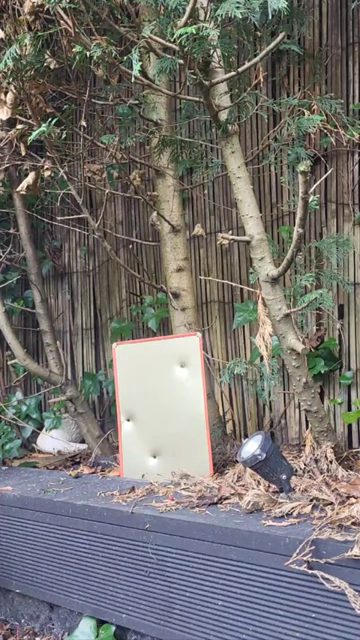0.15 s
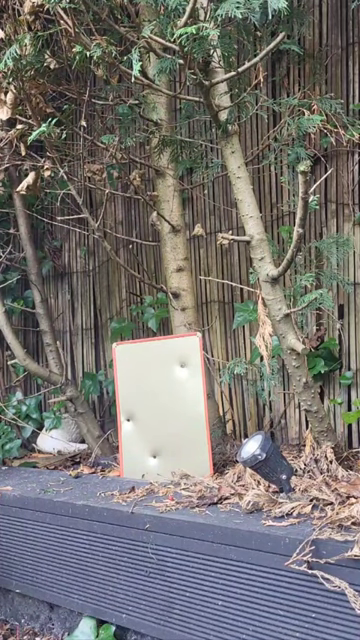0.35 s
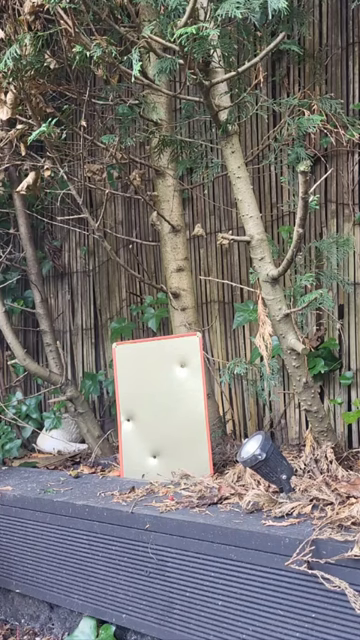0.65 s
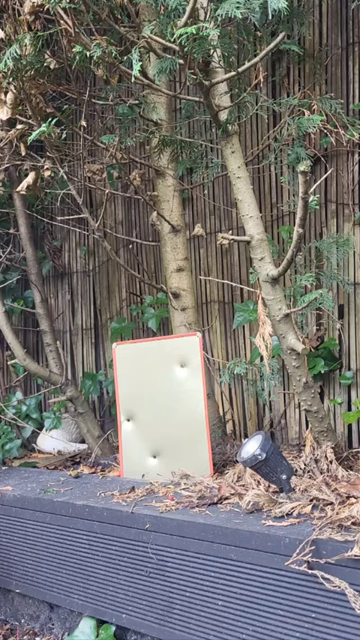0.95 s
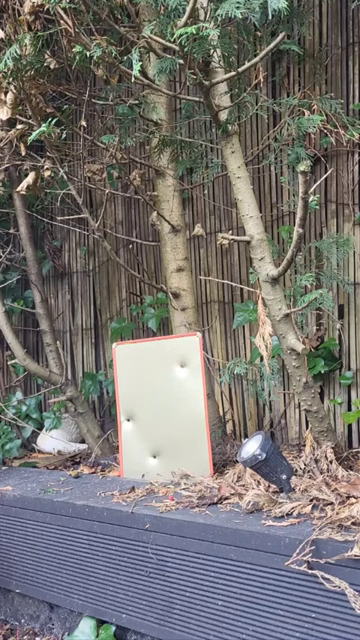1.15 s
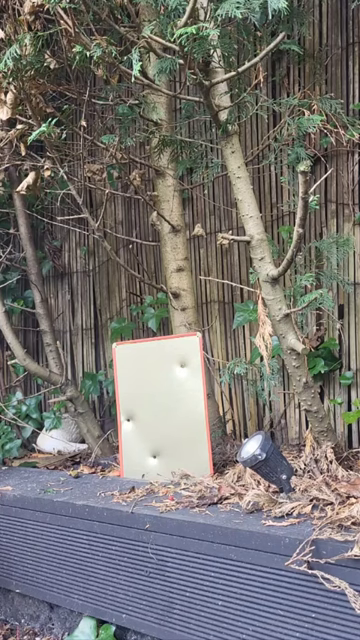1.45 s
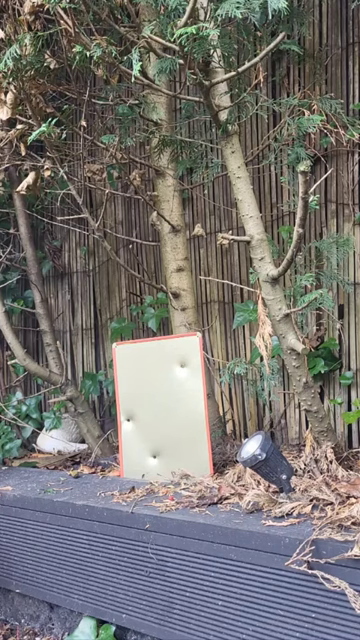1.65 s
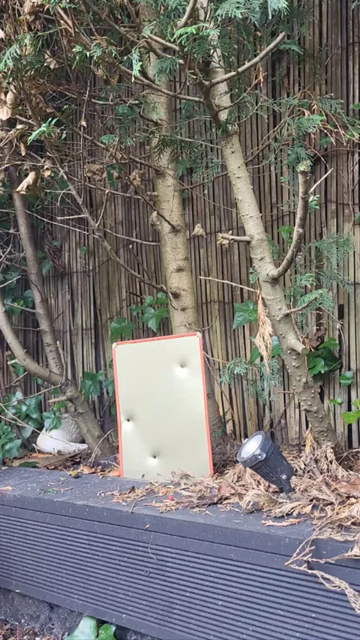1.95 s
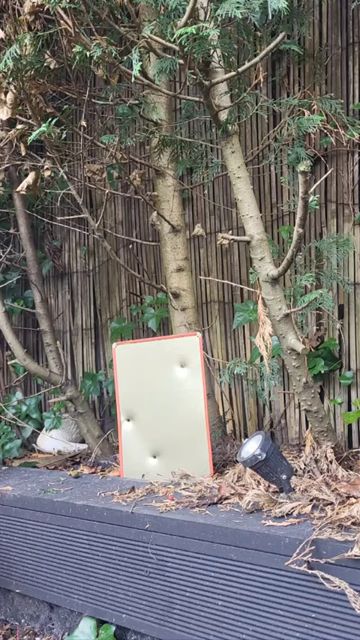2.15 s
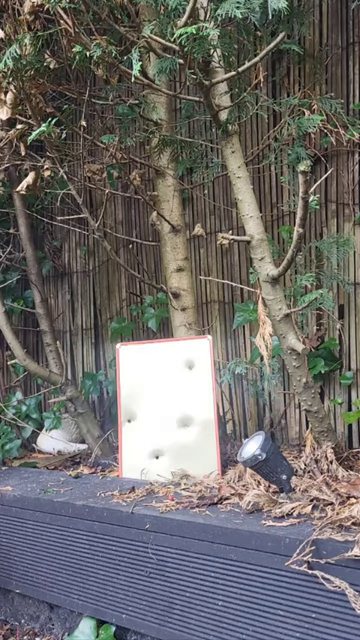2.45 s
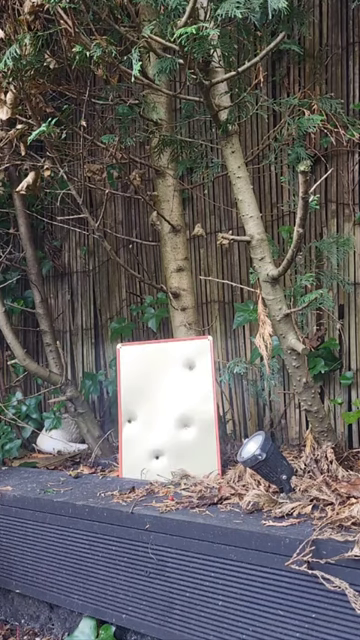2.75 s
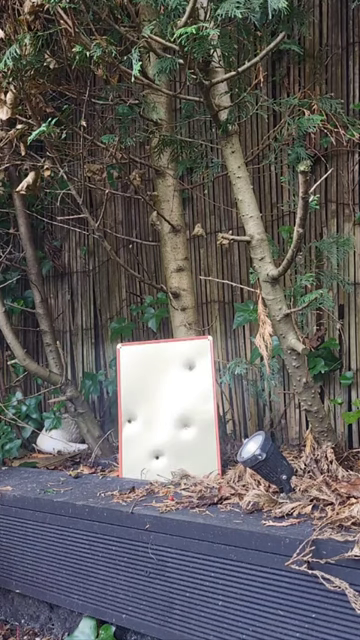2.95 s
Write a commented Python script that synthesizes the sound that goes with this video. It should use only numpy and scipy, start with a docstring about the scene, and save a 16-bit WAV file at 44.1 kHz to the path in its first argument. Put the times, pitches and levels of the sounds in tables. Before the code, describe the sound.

An air rifle fires once after two quiet seconds; almost at once the pellet dents a thin metal plate with a bright crash and brief rattle. Garden echo fades over low rumble, recorded in stereo near the shot.

```python
"""A spring air rifle fires once in a garden: its knocks are clicks and rattles of dense metal modes.
A moment later the pellet dents a thin plate: a damped pulse, a noisy crash, ringing modes and knocks.
The fence and trees scatter the sound back, made by sparse random echoes. Behind lie filtered noises:
low rumble, distant traffic, a leafy hiss with ticks and a very faint early bird.
The shot pushes the recorder's gain down, and the background with it."""
import sys
import numpy as np
from scipy import signal
from scipy.fft import rfft, irfft
from scipy.io import wavfile
from scipy.ndimage import uniform_filter1d

SR = 44100
rng = np.random.default_rng(int(sys.argv[2]) if len(sys.argv) > 2 else 0)


def wrap_up_sound(samples):
    """Save the sound to the file named by the first command line argument, as 16-bit audio."""
    columns = np.atleast_2d(samples).T
    # keep every value between -1 and 1, then stretch to whole-number steps
    tamed = np.clip(columns, -1, 1)
    steps = np.round(tamed * 32767).astype(np.int16)
    wavfile.write(sys.argv[1], SR, steps)


N = 136710

# colour of the plate's dense modes: (frequency [Hz], density level [dB per Hz])
PLATE_COLOUR = [(60, -12), (250, -11), (400, -15.5), (550, -13), (760, -2), (1150, -7), (1550, -1.5),
                (1900, -5.5), (2500, -5), (3100, 0.5), (4400, 1), (6200, 0), (8000, 3.5), (10700, -6),
                (12000, -4), (15500, -7)]
PLATE_START_S = 2.2288


def amp(db):
    """Decibels to gain."""
    return 10 ** (np.asarray(db) / 20)


def unit(x):
    """Scales to rms 1."""
    return x / np.sqrt(np.mean(x ** 2) + 1e-20)


def read(points, hz):
    """Reads a table on a log-frequency axis."""
    f, value = np.transpose(points)
    return np.interp(np.log(hz + 1), np.log(f + 1), value)


def level(points):
    """Gain along a curve of (time [s], level [dB]) points."""
    return amp(np.interp(np.arange(N) / SR, *np.transpose(points)))


def add(mix, s, sound):
    """Mixes a sound in at time s, cut at the end of the mix."""
    part = mix[:, round(s * SR):][:, :sound.shape[-1]]
    part += sound[..., :part.shape[-1]]


def colour(x, points, share=1):
    """Minimum-phase filter with a share of the given dB curve."""
    size = 8192
    hz = abs(np.fft.fftfreq(size, 1 / SR))
    log_gain = np.log(amp(share * read(points, hz)))
    response = np.exp(np.conj(signal.hilbert(log_gain)))
    taps = np.fft.ifft(response).real[:size // 2]
    return signal.fftconvolve(x, taps[None], axes=1)[:, :x.shape[1]]


def noise(spectrum, likeness, size):
    """Stereo noise of rms 1 with a given colour and left-right likeness."""
    hz = np.fft.rfftfreq(size, 1 / SR)
    mid, side = rfft(rng.standard_normal((2, size)))
    same = np.clip(read(likeness, hz), -1, 1)
    mid = mid * np.sqrt(1 + same)
    side = side * np.sqrt(1 - same)
    left_right = np.array([mid + side, mid - side])
    return unit(irfft(left_right * amp(read(spectrum, hz)), size))


def fall(t, t60):
    """Exponential decay by 60 dB in t60 seconds."""
    return np.exp(-np.log(1000) * np.maximum(t, 0) / t60)


def swell(t, rise, t60):
    """Linear rise, then exponential decay."""
    return np.minimum(t / rise, 1) * fall(t - rise, t60)


def die_away(x, t60s, hold=0):
    """Lets each band decay at its own speed after a hold."""
    hz, t, z = signal.stft(x, SR, nperseg=256)
    z = z * fall(t - hold, read(t60s, hz)[:, None])
    return signal.istft(z, SR, nperseg=256)[1][:, :x.shape[1]]


def drift(slow_hz, fast_hz):
    """Random wander of rms 1: twenty sines with random phases."""
    t = np.arange(N) / SR
    rates = np.geomspace(slow_hz, fast_hz, num=20)
    return unit(sum(np.sin(2 * np.pi * (f * t + rng.random())) for f in rates))


def metal(spectrum, size):
    """The dense modes of a metal part: noise of rms 1 gathered into uneven random peaks."""
    # left-right likeness of the dense modes: (frequency [Hz], likeness [0-1])
    shot_likeness = [(100, 0.3), (500, 0.8), (1200, 0.34), (3000, 0.03), (8000, 0)]
    bunch_db, bunch_spacing_hz = 2.3, 70
    hz = np.fft.rfftfreq(size, 1 / SR)
    rows = rng.standard_normal((3, 1024))
    bunches = [np.interp(hz / bunch_spacing_hz, np.arange(len(row)), row) for row in rows]
    # one bunching is common to both ears, one belongs to each ear
    peaks_db = bunch_db * (np.array(bunches[1:]) + bunches[0]) / np.sqrt(2)
    return unit(irfft(rfft(noise(spectrum, shot_likeness, size)) * amp(peaks_db), size))


def rifle():
    """Each knock is a click and a short steel rattle; the stock thuds with the recoil."""
    # release, piston, air blast, spring:
    # (time [s], click peak [dB], rattle level [dB], rattle rise [s], rattle t60 [s])
    knocks = [(2.1995, -2.5, -10.5, .002, .04), (2.2062, 17.5, 4.5, .0003, 0.051),
              (2.2110, 5, 3.5, 0.0023, 0.14), (2.2179, 9.5, 5, 0.0017, 0.031)]
    # colour of the rifle's action: (frequency [Hz], density level [dB per Hz])
    action_colour = [(40, -2), (120, -4.5), (280, -8.5), (600, -8.5), (1000, -7), (1450, -3.5),
                     (2200, -9.5), (3200, -1.5), (5100, 0), (5900, -1), (7400, 2), (10500, -7.5),
                     (12000, -5), (15500, -4.5)]
    # recoil thud of the stock: (frequency [Hz], peak level [dB], rise [s], t60 [s])
    stock_modes = [(73, -11, .017, .12), (134, -21, .014, 0.087), (281, -12, 0.0026, 0.13)]
    recoil_s = 2.2012
    out = np.zeros((2, N))
    t = np.arange(SR // 2) / SR
    click = colour(signal.unit_impulse(len(t))[None], action_colour)
    click = click / abs(click).max()
    for s, click_db, rattle_db, rise, t60 in knocks:
        rattle = metal(action_colour, len(t)) * swell(t, rise, t60)
        add(out, s, amp(click_db) * click + amp(rattle_db) * rattle)
    for hz, db, rise, t60 in stock_modes:
        thud = np.sin(2 * np.pi * hz * t) * swell(t, rise, t60)
        add(out, recoil_s, amp(db) * thud)
    return out


def pellet():
    """The dent pushes out a short, strongly damped pressure pulse."""
    # the blow and its bounce off the decking:
    # (time [s], level [dB], half the decay time constant [s], right-ear lead [s])
    blows = [(2.229, 15.5, 0.00024, .00012), (2.2298, 10, 0.00019, -.00015)]
    ring_hz = 900
    out = np.zeros((2, N))
    for s, db, width, lead in blows:
        t = np.maximum(np.arange(N) / SR - s + np.array([[0], [lead]]), 0)
        ring = np.cos(2 * np.pi * ring_hz * t + np.pi / 6)
        out -= amp(db) * (t > 0) * np.exp(-t / (2 * width)) * ring
    return out


def plate():
    """The thin sheet crashes with countless modes, a few of which ring out clearly."""
    # decay of the dense modes: (frequency [Hz], t60 [s])
    crash_t60 = [(100, .25), (1000, 0.23), (4000, 0.21), (8000, .16), (15000, 0.12)]
    # clear modes: (frequency [Hz], peak level [dB], t60 [s])
    clear_modes = [(797, -18, 0.18), (2096, -23.5, 0.18), (3120, -14.5, .16), (3700, -12, .18),
                   (3932, -12, 0.21), (4340, -13.5, .26), (5360, -8, 0.21), (7371, -10.5, .18),
                   (7650, -10, .16), (7838, -6, .17), (8610, -1.5, 0.12), (8930, -7.5, .15),
                   (9315, -11.5, .15), (14010, -10, .13)]
    crash_db, crash_rise_s, crash_hold_s, ring_rise_s = 5, 0.00056, 0.03, 0.015
    out = np.zeros((2, N))
    t = np.arange(SR) / SR
    crash = die_away(metal(PLATE_COLOUR, SR), crash_t60, crash_hold_s)
    add(out, PLATE_START_S, amp(crash_db) * crash * np.minimum(t / crash_rise_s, 1))
    for hz, db, t60 in clear_modes:
        ring = np.sin(2 * np.pi * (hz * t + rng.random((2, 1))))  # own phase in each ear
        add(out, PLATE_START_S, amp(db) * ring * swell(t, ring_rise_s, t60))
    return out


def rattles():
    """The struck plate jumps and knocks against the decking and the trunk: clicks with short tones."""
    # (time [s], click peak [dB], thud level [dB], thud pitch [Hz])
    plate_knocks = [(2.238, 2.5, -13, 60.3), (2.249, 6, 5.5, 2703), (2.2533, 9.5, -17.5, 129.2),
                    (2.2565, 9, -19, 260), (2.2675, 2, -3, 851.3), (2.279, 1, -5, 480.4)]
    thud_cycles = 9  # cycles until the thud has fallen by 60 dB
    out = np.zeros((2, N))
    t = np.arange(SR // 2) / SR
    click = colour(signal.unit_impulse(len(t))[None], PLATE_COLOUR)
    click = click / abs(click).max()
    for s, click_db, thud_db, hz in plate_knocks:
        thud = np.sin(2 * np.pi * hz * t) * fall(t, thud_cycles / hz)
        add(out, s, amp(click_db) * click + amp(thud_db) * thud)
    return out


def garden(x):
    """Scattered echoes from the fence, trunks and walls: sparse random taps that die away."""
    # echo decay: (frequency [Hz], t60 [s])
    echo_t60 = [(100, .35), (700, 0.31), (2000, 0.3452), (4500, 0.3028), (8000, 0.273), (14000, .25)]
    # echo colour: (frequency [Hz], gain [dB])
    echo_colour = [(60, -17.5), (250, -12), (800, -11.5), (2000, -12), (4500, -18), (8000, -17),
                   (15000, -17.5)]
    delay_s = .02
    taps = rng.choice([-1, 1], (2, SR)) * (rng.random((2, SR)) < 1 / 20)
    tail = die_away(taps, echo_t60)
    tail = colour(tail / np.linalg.norm(tail, axis=1, keepdims=True), echo_colour)
    out = np.zeros((2, N))
    add(out, delay_s, signal.fftconvolve(x, tail, axes=1))
    return out


def bird():
    """Thin calls from far away, blurred by the trees into narrow bands of noise."""
    # (time [s], length [s], pitch [Hz], rms level before the fades [dB])
    chirps = [(.08, 0.037, 4600, -80), (.17, 0.082, 4760, -77)]
    spread_hz = 100
    out = np.zeros((2, N))
    for s, length, hz, db in chirps:
        size = round(length * SR)
        band = np.exp(-((np.fft.rfftfreq(size, 1 / SR) - hz) / spread_hz) ** 2 / 2)
        call = unit(irfft(rfft(rng.standard_normal((2, size))) * band, size))
        add(out, s, amp(db) * np.sqrt(np.hanning(size)) * call)
    return out


def background():
    """A lumpy low rumble, the wash of distant traffic and a faint hiss of leaves with dry ticks."""
    # left-right likeness: (frequency [Hz], likeness [0-1])
    air_likeness = [(50, .88), (150, .88), (400, .75), (1000, .5), (2500, .1), (10000, .1)]
    # noise colours: (frequency [Hz], relative density [dB per Hz])
    rumble_colour = [(15, -36.5), (27, -19), (37, -3.5), (49, 7.5), (62, -2), (80, 1), (108, -4),
                     (135, -11.5), (185, -26.5), (265, -21), (370, -36.5), (700, -61.5)]
    traffic_colour = [(100, -8), (300, -0.5), (500, 0), (750, -1), (1050, 0), (1550, -9), (2300, -21.5),
                      (4000, -37)]
    leaf_colour = [(1000, -16), (2500, -6), (4000, -2), (6000, -1.5), (8100, 1), (9300, -5), (10700, -13.5),
                   (13000, -10), (15500, -7)]
    # loudness curves: (time [s], level [dB])
    rumble_curve = [(0, -51), (.18, -45), (.3, -50.5), (.42, -45), (.55, -47), (.72, -44), (.9, -49.5),
                    (1.15, -47.5), (1.4, -46.5), (1.55, -45.5), (1.85, -43.5), (2.05, -51.5), (2.17, -45),
                    (2.38, -48.5), (2.55, -43.5), (3.1, -46.5)]
    traffic_curve = [(0, -63), (1.1, -63.5), (2.1, -64), (2.6, -64), (3.1, -69)]
    leaf_curve = [(0, -74), (.5, -74.5), (.9, -74.5), (1.35, -72), (1.55, -68), (1.76, -66), (1.89, -68),
                  (1.96, -67), (2.06, -68.5), (2.6, -68), (3.1, -73)]
    # ticks of dry leaves: (time [s], level [dB])
    tick_events = [(1.005, -72), (1.083, -67.5), (1.70, -76), (1.97, -64)]
    rumble_swell_db, leaf_flicker_db, tick_t60_s = 2, 0.77, .09
    t = np.arange(N) / SR
    lumps = amp(rumble_swell_db * drift(slow_hz=4, fast_hz=14))
    rumble = noise(rumble_colour, air_likeness, N) * level(rumble_curve) * lumps
    traffic = level(traffic_curve) * noise(traffic_colour, air_likeness, N)
    rustle = level(leaf_curve) * amp(leaf_flicker_db * drift(slow_hz=5.1, fast_hz=70))
    ticks = sum(amp(db) * (t > s) * fall(t - s, tick_t60_s) for s, db in tick_events)
    leaves = np.hypot(rustle, ticks) * noise(leaf_colour, air_likeness, N)
    return rumble + traffic + leaves


def scene():
    """The shot, its echo and the garden's background."""
    shot = rifle() + plate() + rattles()
    blow = pellet()
    # the plate beams the blow mostly forward, so less of it reaches the echo
    echo = garden(shot + amp(-7) * blow)
    return shot + blow + echo + background() + bird()


def record(dry):
    """Two unlike microphones, a low cut, gain control that drops at once and barely recovers, a high cut."""
    # microphone balance, shared out between left and right: (frequency [Hz], balance [dB])
    balance = [(100, -.5), (1000, 3), (5000, 1.5), (7400, -4), (8500, -7.5), (9400, -8.5), (10600, -1.5),
               (12000, 0), (14500, -6.5)]
    limit_db, limit_share = -15.5, 0.91  # share of the excess that is taken away
    look_ahead_s, meter_s, recover_db_per_s = .009, .016, .3
    low_cut_hz, high_cut_hz = 35, 15600
    left = colour(dry[:1], balance, 0.44)
    right = colour(dry[1:], balance, -0.55)
    x = np.vstack([left, right])

    power = abs(uniform_filter1d((x ** 2).mean(0), round(meter_s * SR)))
    power_db = 10 * np.log10(power + 1e-12)
    # the running peak sinks slowly: this is the recovery
    recovery = np.arange(N) / SR * recover_db_per_s
    held_db = np.maximum.accumulate(power_db + recovery) - recovery
    over_db = uniform_filter1d(np.maximum(held_db - limit_db, 0), size=256)
    ahead_db = np.interp(np.arange(N) + look_ahead_s * SR, np.arange(N), over_db)

    low_cut = signal.butter(N=4, Wn=low_cut_hz, btype="highpass", fs=SR, output="sos")
    x = signal.sosfilt(low_cut, x) * amp(-limit_share * ahead_db)
    high_cut = signal.firwin(255, high_cut_hz, window=("kaiser", 8), fs=SR)
    return signal.oaconvolve(x, high_cut[None], "same")


dry = scene()
out = record(dry)
wrap_up_sound(out)
```